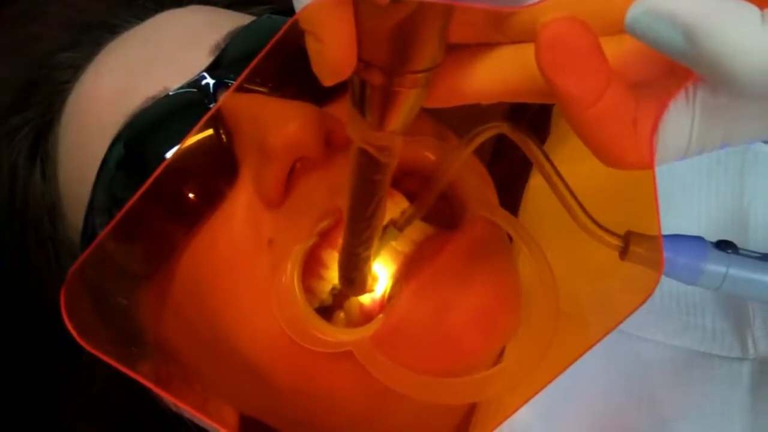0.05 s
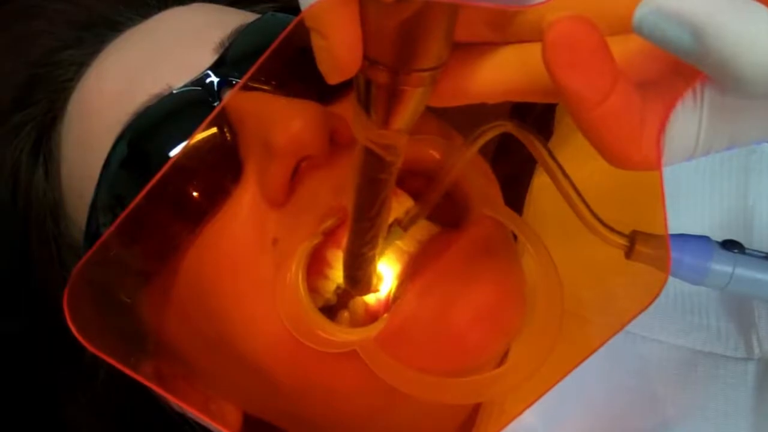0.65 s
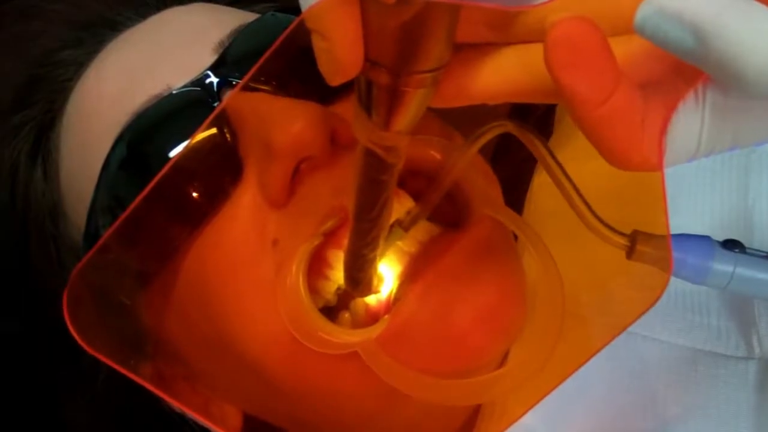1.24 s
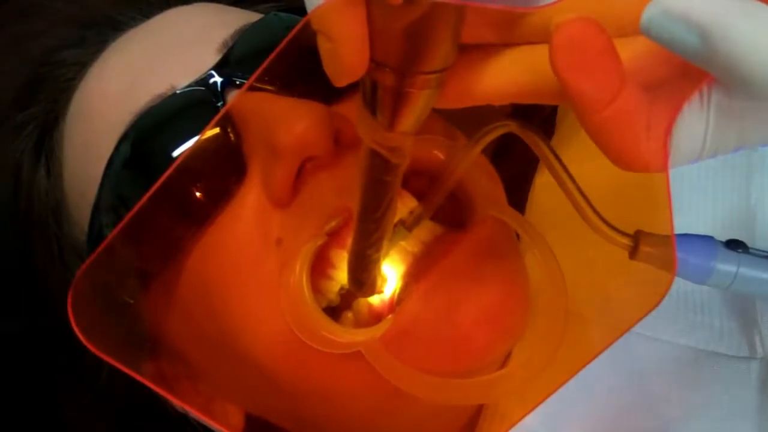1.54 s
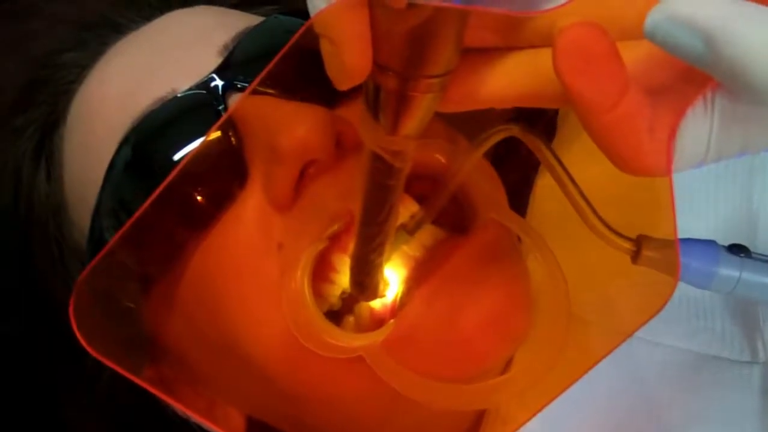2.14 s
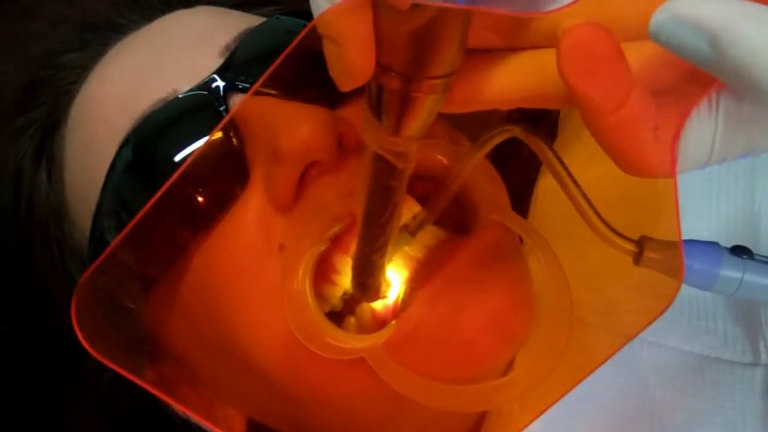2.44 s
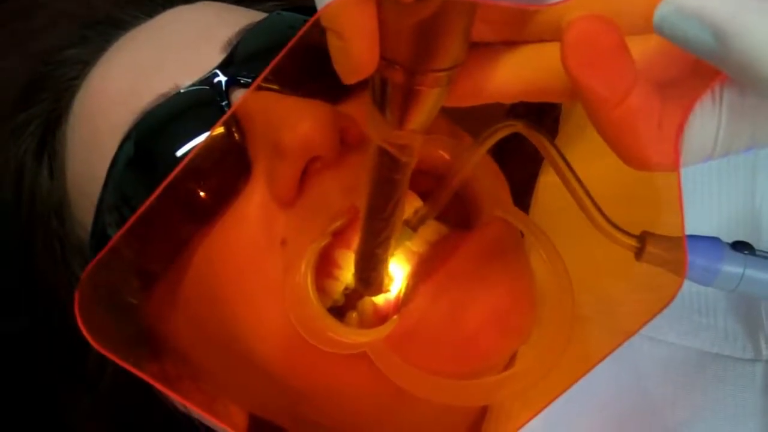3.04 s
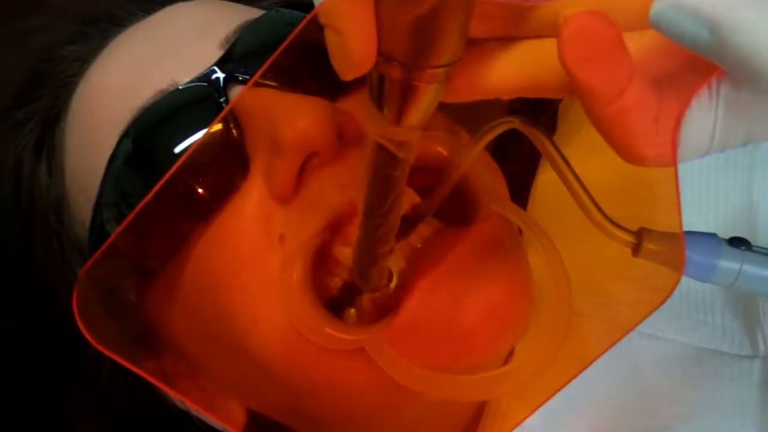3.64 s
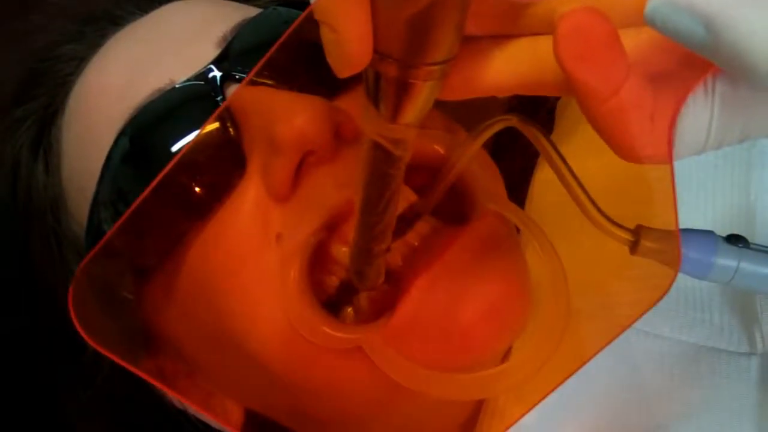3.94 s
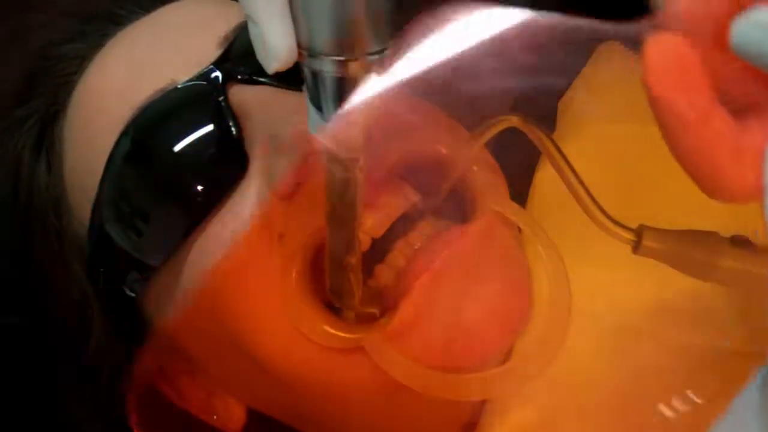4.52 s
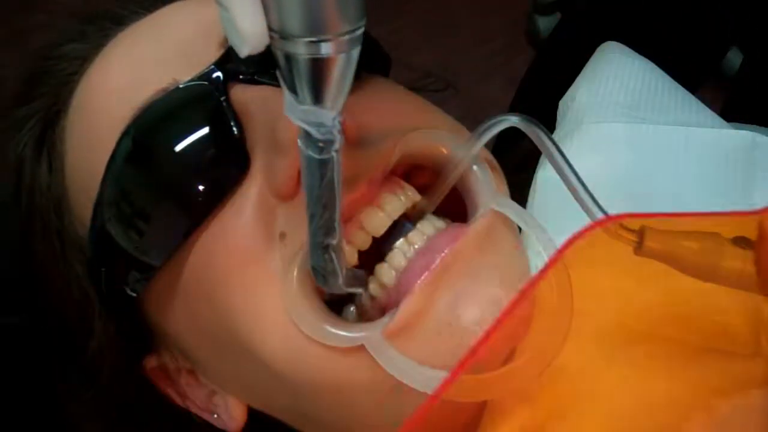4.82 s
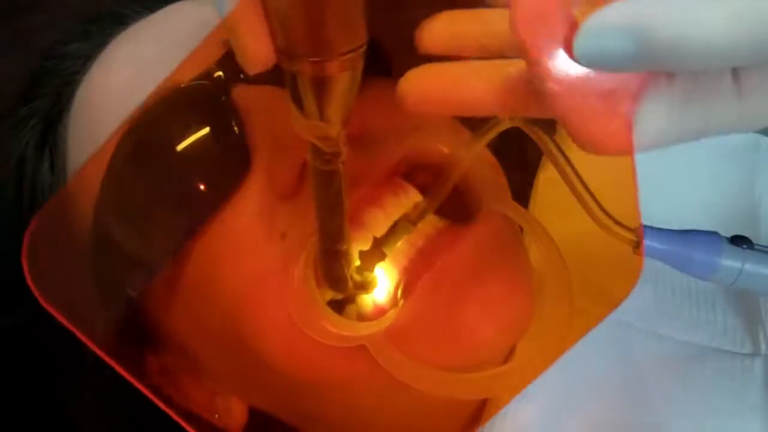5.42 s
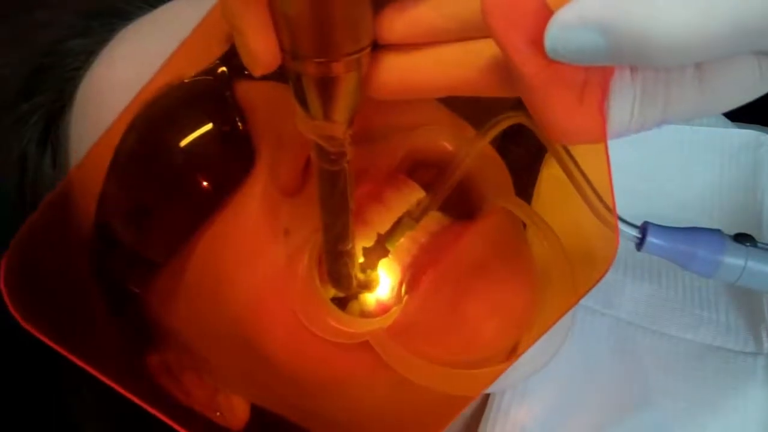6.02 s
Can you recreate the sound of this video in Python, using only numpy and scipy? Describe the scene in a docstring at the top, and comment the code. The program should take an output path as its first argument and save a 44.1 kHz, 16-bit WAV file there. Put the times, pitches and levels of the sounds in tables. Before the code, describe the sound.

Close to a patient's mouth in a dental clinic, a saliva suction tube hisses continuously above a very quiet machine hum and whine. Past the middle, the tip shifts and brief high whistles colour the rush of air. The hiss becomes softer and hollow for under a second while a shield is moved aside, then comes back with more treble and carries on.

```python
"""A saliva ejector sucks air in a patient's open mouth, close by, in a dental surgery.
Turbulence at its tip is broadband noise that excites the resonances of the mouth and the tube.
A hand-held light shield swings away and back: the hiss dips and turns hollow as the paths round the
shield interfere, and the tip settles a little differently.
Beneath the hiss lie a low machine hum and a thin motor whine."""
import sys
import numpy as np
from scipy import signal
from scipy.io import wavfile
from scipy.ndimage import uniform_filter1d

SR = 44100
rng = np.random.default_rng(int(sys.argv[2]) if len(sys.argv) > 2 else 0)


def dump_mix(stems):
    """Bounce the given channels to the path in sys.argv[1] as a 16-bit WAV at rate SR."""
    frames = np.atleast_2d(stems).T  # one column per channel
    limited = np.clip(frames, -1, 1)  # hard clip at full scale
    pcm = np.round(limited * 32767).astype(np.int16)
    wavfile.write(sys.argv[1], SR, pcm)


N = 276495

# resonances of mouth and tube:
# (frequency [Hz], width [Hz], gain as first seated [dB], gain once shifted [dB], left minus right [dB])
MOUTH_MODES = [(1318, 177, -2, -4.5, 6.5), (1455, 325, -2, -4, 2.5), (1680, 242, -0.64, -0.2, 3),
               (2175, 480, -13, -15, 10.5), (2687, 360, -7, -6, 5.5), (2894, 182, -0.26, -3, 4.5),
               (3780, 600, -22, -26, 1), (4285, 467, -0.8, -2.7, 2.5), (4636, 250, -6.5, -5, 4),
               (5210, 1100, -14.5, -18, -5.5), (6425, 480, -10.5, -15, 6), (6783, 118, -6, -10.5, 15.5),
               (7030, 450, -6, -10.5, 1.5), (8214, 510, -10.5, -7.5, 12.5), (9000, 610, -15, -11, 6),
               (9540, 430, -13, -18.5, 15.5), (10180, 490, -11.5, -16.5, 19.5),
               (10550, 550, -15.5, -26, 16.5), (11820, 530, -16.5, -22, 8.5), (12100, 380, -15, -23, 1)]
# broad hiss of the jet:
# (frequency [Hz], gain as first seated [dB], gain once shifted [dB], left minus right [dB])
JET_SPECTRUM = [(30, -35, -28, 4), (130, -24.5, -25, 3), (370, -26, -24.5, 2.5), (580, -20, -20.5, 3),
                (820, -20.5, -18, 3), (1090, -21.5, -19.5, 7), (2070, -15.5, -12.5, 0.5),
                (3100, -13, -16, 9), (5700, -18.5, -10, 7), (7700, -20, -11, 5), (11200, -16.5, -16, 8),
                (13040, -32, -21.5, 10), (14180, -30.5, -41, 23), (15100, -44, -60, 8)]
# how far the tip has shifted in the mouth: (time [s], share [0-1])
TIP_SHIFT = [(4.0, 0), (4.2, 0.5), (5.0, 0.94), (5.5, 0.86)]
# likeness of the hiss in the two channels: (frequency [Hz], correlation [0-1])
CORRELATION = [(40, 0.5), (290, 0.81), (900, 0.85), (1450, 1), (2300, 0.74), (2900, 0.97), (3600, 0.7),
               (4350, 0.78), (5700, 0.3), (6900, 0.29), (7800, 0.05), (10000, 0.31), (14000, 0.15)]
# the tip draws more or less air: (time [s], half length [s], gain [dB])
FLOW_SURGES = [(0.55, 0.39, 1), (1.45, 0.3, 1), (2.14, 0.079, 2), (2.77, 0.086, -2), (3.68, 0.11, -1.5)]
# the middle resonances open up as the instruments are moved: (time [s], half length [s], gain [dB])
MOUTH_OPENING = [(4.62, 0.44, 7.5)]
# swells of the tube's main ring:
# (time [s], half length [s], gain [dB], frequency [Hz], left minus right [dB])
TUBE_SWELLS = [(1.47, 0.32, 0, 4290, 1.7), (2.6, 0.14, 4, 4340, 0.5), (3.485, 0.074, 3, 4370, 1.2),
               (4.274, 0.2, 7.5, 4220, 2.2), (4.658, 0.082, 14, 4090, 2), (5.104, 0.1, 13.5, 4140, -2),
               (5.863, 0.7, 5.5, 4335, 9.5)]
# a high whistle that splits in two as the tip is nudged:
# (time [s], half length [s], gain [dB], frequency [Hz])
TIP_WHISTLES = [(4.28, 0.1, 13.5, 6630), (4.41, 0.065, 13, 6530), (4.567, 0.065, 9, 6270),
                (4.58, 0.09, 9, 7170), (4.77, 0.06, 5, 6500), (5.8, 0.6, 9, 6630)]
# the shield leaves fast, slows at the far end and speeds up on the way back:
# (time [s], first notch [Hz], strength [0-1])
SHIELD_SWING = [(4.42, 4700, 0.04), (4.48, 4200, 0.6), (4.52, 3400, 1), (4.64, 3200, 0.7), (4.8, 3200, 0.7),
                (5.0, 3160, 0.7), (5.12, 3200, 0.9), (5.2, 3400, 1), (5.25, 3870, 1), (5.29, 4520, 0.8),
                (5.35, 5000, 0.04)]
# where the paths round the shield cancel: (multiple of the first notch [ratio], width [Hz], gain [dB])
SHIELD_NOTCHES = [(1, 302, -16.5), (1.46, 520, -12), (2.5, 620, -7.5)]
# resonance of the gap between shield and face: (time [s], frequency [Hz], strength [0-1])
CAVITY_GLIDE = [(4.42, 1630, 0), (4.55, 1590, 0.9), (4.72, 1520, 1), (4.93, 1470, 0.9), (5.08, 1575, 0.95),
                (5.22, 1630, 0.7), (5.36, 1720, 0)]
# that resonance's peak and the notch on either side: (offset from centre [Hz], width [Hz], gain [dB])
CAVITY_SHAPE = [(-170, 140, -2), (0, 125, 9), (235, 250, -13)]
# the dip while the shield is away, the treble falling last:
# (frequency [Hz], time of fall [s], fall time [s], time of return [s], return time [s], gain [dB])
LEVEL_DIP = [(700, 4.73, 0.04, 5.37, 0.17, -7.5), (1280, 4.72, 0.089, 5.25, 0.12, -9),
             (1650, 4.69, 0.12, 5.24, 0.15, -8), (2800, 4.65, 0.21, 5.35, 0.18, -6.5),
             (5360, 5.02, 0.1, 5.38, 0.047, -4.5), (11000, 4.97, 0.11, 5.41, 0.16, -7)]
# the machine's drone swells and sinks: (time [s], half length [s], gain [dB])
DRONE_SURGES = [(0.97, 0.08, 2), (1.55, 0.1, 6), (3.3, 0.7, -2.5), (4.1, 0.074, 7), (4.32, 0.05, 4),
                (5.0, 0.12, 8), (5.54, 0.08, 9), (5.96, 0.14, 6.5)]
# the machine's hum tones: (frequency [Hz], pitch wander [Hz], level before panning and dip [dB])
HUM_TONES = [(46, 3.9, -86), (101, 4.95, -77.5), (207, 5.5, -79), (320.3, 2.7, -81), (444.4, 5.5, -74),
             (497, 4.32, -77.5), (595.5, 7.03, -69.5), (747, 8.36, -75), (1160, 2.66, -79)]


def suction(frame=1024):
    """Source and filter: the jet's noise is shaped by mouth, tube and shield, frame by frame."""
    framing = dict(fs=SR, nperseg=frame, noverlap=frame - frame // 4)
    hz, s, (shared, *separate) = signal.stft(turbulence(), **framing)
    correlation = across(CORRELATION, hz[:, None])[0]
    jet = np.sqrt(correlation) * shared + np.sqrt(1 - correlation) * np.array(separate)
    airway = mouth(hz, s) * mouth_opening(hz, s) * tube_ring(hz, s) * tip_whistle(hz, s)
    hiss = jet * air_flow(hz, s) * airway * shield(hz, s)
    return signal.istft(hiss, **framing)[1][:, :N]


def turbulence(flutter_db=0.43, flutter_hz=45, reflection_db=-12, decay_s=0.093):
    """Amplitude modulation: three noises flutter as the wet tip trembles; reflections ripple them."""
    noise = rng.standard_normal((3, N)) * undb(flutter_db * walk(flutter_hz))
    t = np.arange(SR // 4) / SR
    reflections = rng.standard_normal(len(t)) * undb(-60 * t / decay_s)
    reflections *= undb(reflection_db) / np.linalg.norm(reflections)
    return noise + signal.fftconvolve(noise, reflections[None], axes=1)[:, :N]


def air_flow(hz, s, body_db=-25.5, treble_db=-26.5, treble_surge=0.74):
    """Flow noise grows with the flow: surges move the low resonances most and the treble less."""
    treble = treble_share(hz)
    surge_db = swells(FLOW_SURGES, s)
    return undb((1 - treble) * (body_db + surge_db) + treble * (treble_db + treble_surge * surge_db))


def mouth(hz, s, saliva_db=0.76, saliva_hz=14, turn_db=0.5):
    """Resonance: modes of mouth and tube add in power, driven as the tip's place and the saliva allow."""
    shift = follow(TIP_SHIFT, s)[0]
    seated_db, shifted_db, side_db = across(JET_SPECTRUM, hz[:, None])
    power = (pan(side_db) * undb(seated_db + shift * (shifted_db - seated_db))) ** 2
    for centre_hz, width_hz, seated_db, shifted_db, side_db in MOUTH_MODES:
        drive = undb(seated_db + shift * (shifted_db - seated_db) + saliva_db * walk_at(saliva_hz, s))
        mode = np.outer(resonance(hz, centre_hz, width_hz), drive)
        power += (pan(side_db)[:, None, None] * mode) ** 2
    return np.sqrt(power) * antiresonance(hz, s, shift) * pan(turn_db * shift)[:, None]


def antiresonance(hz, s, shift, centre_hz=3320, width_hz=230, seated_db=-17, shifted_db=-3):
    """An antiresonance parts the mouth's modes from the tube's ring; it weakens as the tip shifts."""
    notch_hz = centre_hz + 35 * walk_at(9, s)  # the notch wavers slightly in pitch at random
    depth_db = seated_db + shift * (shifted_db - seated_db)
    return undb(depth_db * resonance(hz[:, None], notch_hz, width_hz))


def mouth_opening(hz, s, centre_hz=2450, width_hz=600):
    """Resonant gain: the mouth's middle band opens up and closes again."""
    return undb(np.outer(resonance(hz, centre_hz, width_hz), swells(MOUTH_OPENING, s)))


def tube_ring(hz, s, width_hz=275):
    """Pipe resonance: the tube's main ring swells and fades, a little flatter while the shield is away."""
    gain_db = side_db = 0
    for at, half_s, swell_db, centre_hz, lean_db in TUBE_SWELLS:
        shape = np.outer(resonance(hz, centre_hz, width_hz), bell(s, at, half_s))
        gain_db += swell_db * shape
        side_db += lean_db * shape
    return undb(gain_db) * pan(side_db)


def tip_whistle(hz, s, width_hz=230):
    """Narrow resonances at the tip lift the noise into whistles that come and go as it moves."""
    return undb(sum(db * np.outer(resonance(hz, centre_hz, width_hz), bell(s, at, half_s))
                    for at, half_s, db, centre_hz in TIP_WHISTLES))


def shield(hz, s, uncovered_db=1.6, wobble=0.01, wobble_hz=40):
    """Destructive interference: paths round the shield cancel in notches that fall, then rise again."""
    first_hz, strength = follow(SHIELD_SWING, s)
    gain_db = uncovered_db * treble_share(hz)  # uncovered, the jet is brighter
    for multiple, width_hz, depth_db in SHIELD_NOTCHES:
        notch_hz = multiple * first_hz * (1 + wobble * walk_at(wobble_hz, s))
        gain_db = gain_db + depth_db * resonance(hz[:, None], notch_hz, width_hz)
    return undb(strength * gain_db) * cavity(hz, s) * dip(hz[:, None], s)


def cavity(hz, s):
    """Cavity resonance: a hollow peak between two notches sinks as the gap under the shield widens."""
    centre_hz, strength = follow(CAVITY_GLIDE, s)
    shape_db = sum(db * resonance(hz[:, None], centre_hz + offset_hz, width_hz)
                   for offset_hz, width_hz, db in CAVITY_SHAPE)
    return undb(strength * shape_db)


def dip(hz, s):
    """Attenuation: each band falls and recovers at its own pace while the shield is away."""
    falls, fall_s, returns, return_s, db = across(LEVEL_DIP, hz)
    away = (np.tanh((s - falls) / fall_s) - np.tanh((s - returns) / return_s)) / 2
    return undb(db * away)


def machine(drone_db=-71, whine_db=-54.5, side_db=5.5, drift_db=1.4, drift_hz=7):
    """Superposition: a swelling drone, hum tones and a motor whine; all dip while the shield is away."""
    t = np.arange(N) / SR
    swell_db = swells(DRONE_SURGES, t) + drift_db * walk(drift_hz)
    drone = undb(drone_db + swell_db) * rough_tone(hz=248, wander_hz=4.07, flicker_db=3.6)
    hum = sum(undb(db) * rough_tone(hz, wander_hz, flicker_db=2.6) for hz, wander_hz, db in HUM_TONES)
    whine = undb(whine_db) * rough_tone(hz=2009, wander_hz=1.745, flicker_db=1.0)
    return pan(side_db)[:, None] * (drone + hum + whine) * dip(hz=248, s=t)


def rough_tone(hz, wander_hz, flicker_db, rate_hz=22):
    """Random frequency and amplitude modulation roughen a sine tone, scaled to rms 1."""
    phase = 2 * np.pi * np.cumsum(hz + wander_hz * walk(rate_hz)) / SR
    wave = np.sin(phase) * undb(flicker_db * walk(rate_hz))
    return wave / wave.std()


def resonance(hz, centre_hz, width_hz):
    """Lorentzian resonance curve: 1 at its centre, 1/2 at half a width to either side."""
    return 1 / (1 + (2 * (hz - centre_hz) / width_hz) ** 2)


def treble_share(hz):
    """Crossover: 0 over the mouth's low resonances, 1 over the jet's treble."""
    return np.interp(hz, [3200, 5000], [0, 1])[:, None]


def bell(s, at, half_s):
    """Gaussian envelope of height 1."""
    return np.exp(-((s - at) / half_s) ** 2)


def swells(table, s):
    """Sum of Gaussian swells, in dB, at the times s."""
    return sum(db * bell(s, at, half_s) for at, half_s, db in table)


def walk(rate_hz):
    """Low-pass noise: random levels held 1 / rate_hz seconds and smoothed twice; spread near 1."""
    hold = max(int(SR / rate_hz), 1)
    held = np.repeat(rng.standard_normal(N // hold + 1), hold)
    return 1.404 * uniform_filter1d(uniform_filter1d(held, hold), hold)[:N]


def walk_at(rate_hz, s):
    """Low-pass noise sampled at the times s."""
    return walk(rate_hz)[np.minimum(s * SR, N - 1).astype(int)]


def follow(table, s):
    """Linear interpolation of a table's columns at the times s."""
    times, *columns = np.transpose(table)
    return [np.interp(s, times, column) for column in columns]


def across(table, hz):
    """Interpolation of a table's columns over log frequency."""
    points, *columns = np.transpose(table)
    return [np.interp(np.log(hz + 1), np.log(points), column) for column in columns]


def pan(db):
    """Left and right gains for a level difference."""
    return undb(np.array([db, -db]) / 2)


def undb(db):
    """Decibels to amplitude ratio."""
    return 10 ** (np.asarray(db) / 20)


def scene():
    """Superposition of the suction hiss and the machine."""
    return suction() + machine()


def record(dry, cutoff_hz=14900):
    """Band limiting: a steep low-pass filter removes the highest treble."""
    return signal.sosfilt(signal.ellip(10, .1, 80, cutoff_hz, fs=SR, output="sos"), dry)


dry = scene()
out = record(dry)
dump_mix(out)
```